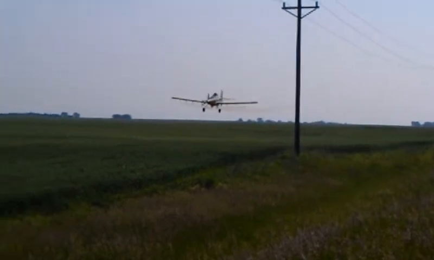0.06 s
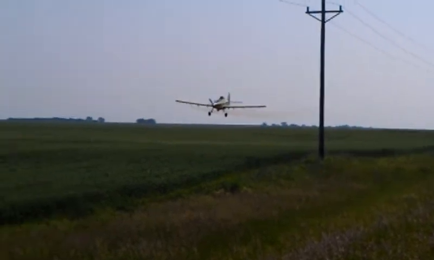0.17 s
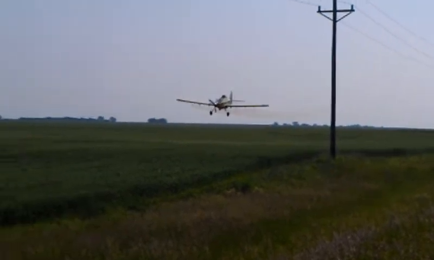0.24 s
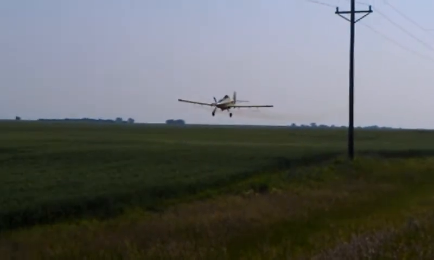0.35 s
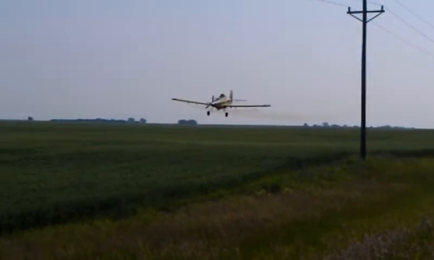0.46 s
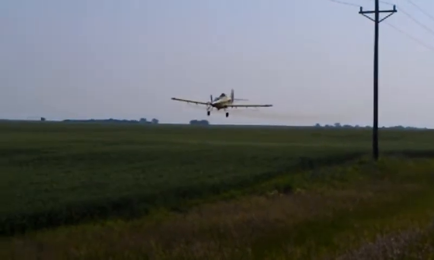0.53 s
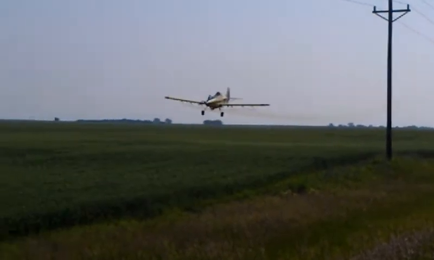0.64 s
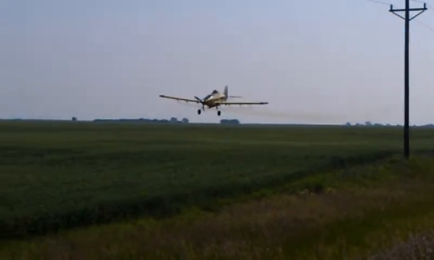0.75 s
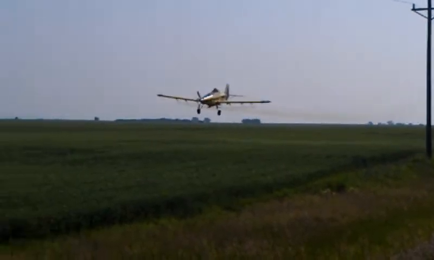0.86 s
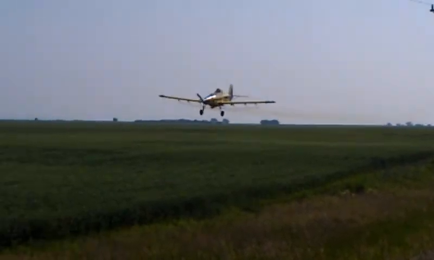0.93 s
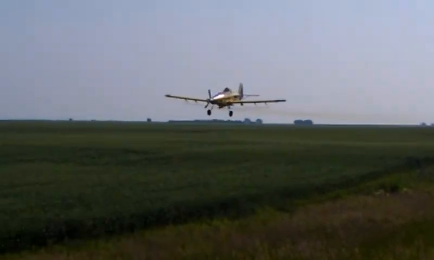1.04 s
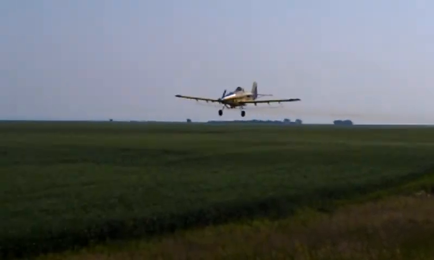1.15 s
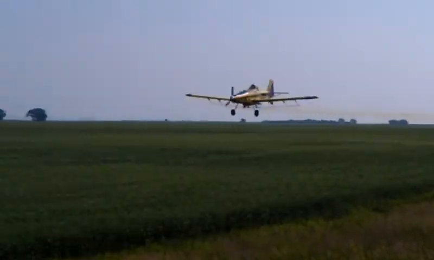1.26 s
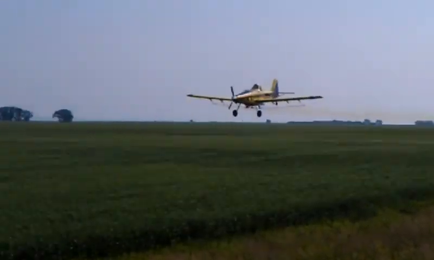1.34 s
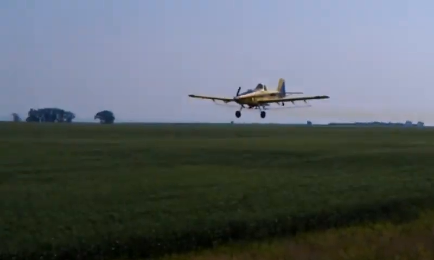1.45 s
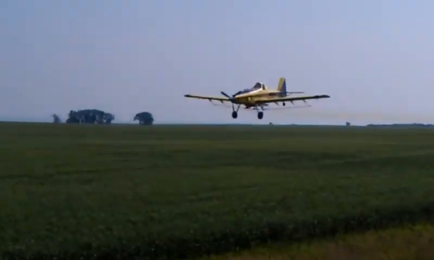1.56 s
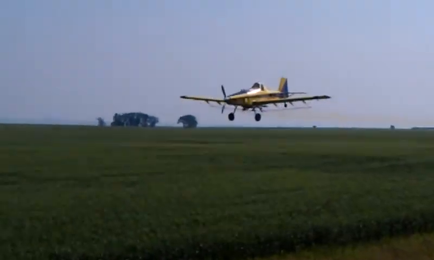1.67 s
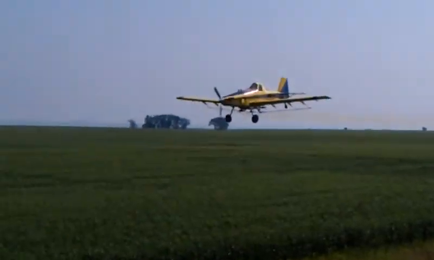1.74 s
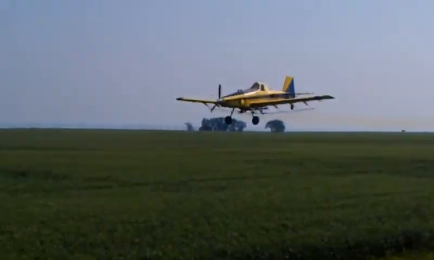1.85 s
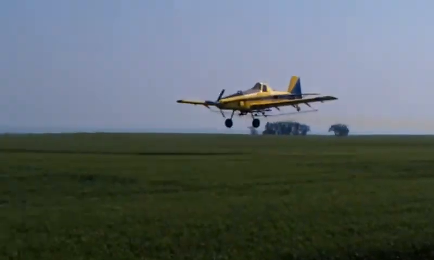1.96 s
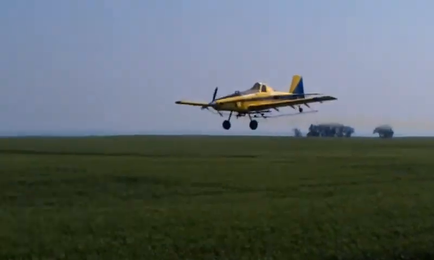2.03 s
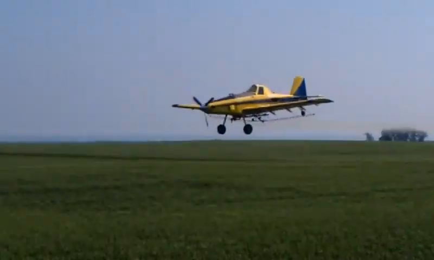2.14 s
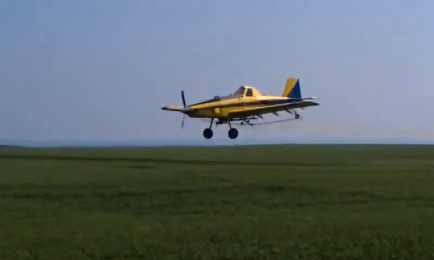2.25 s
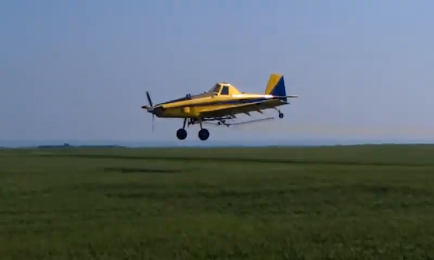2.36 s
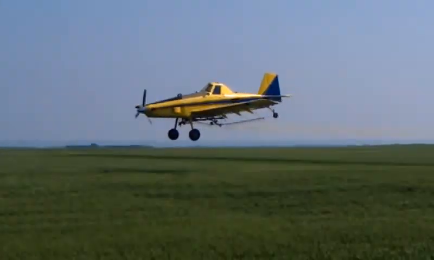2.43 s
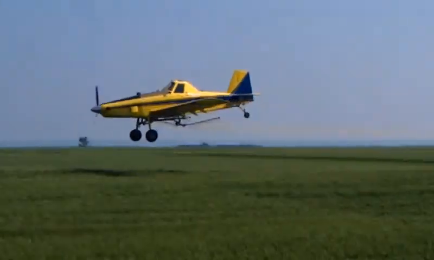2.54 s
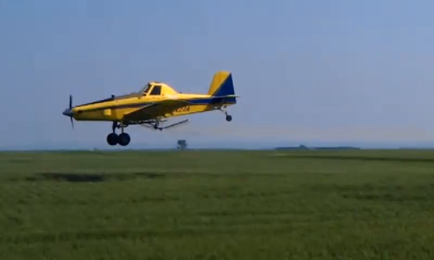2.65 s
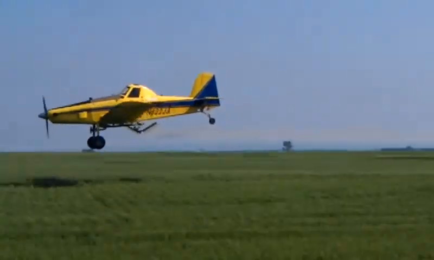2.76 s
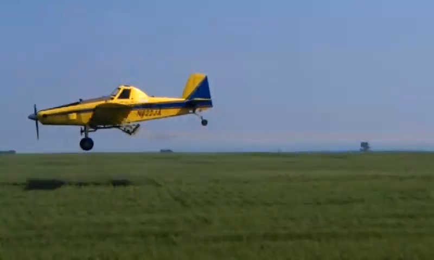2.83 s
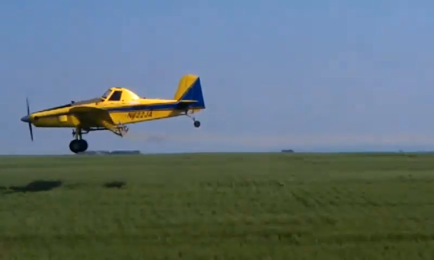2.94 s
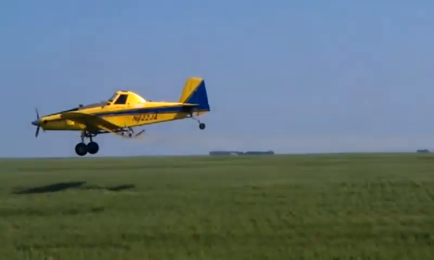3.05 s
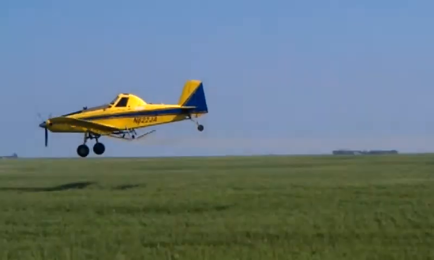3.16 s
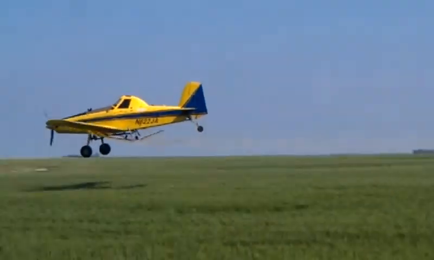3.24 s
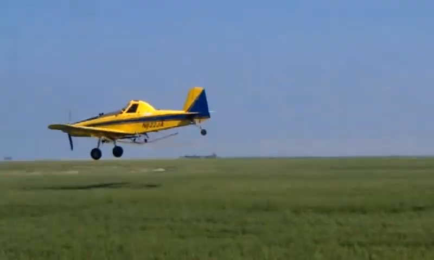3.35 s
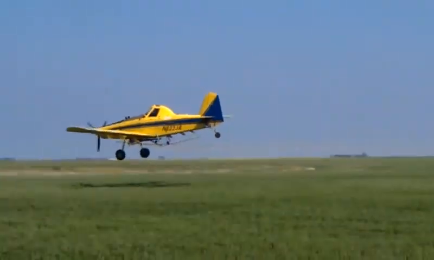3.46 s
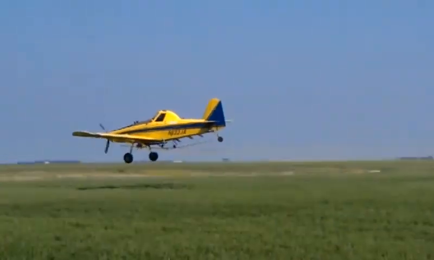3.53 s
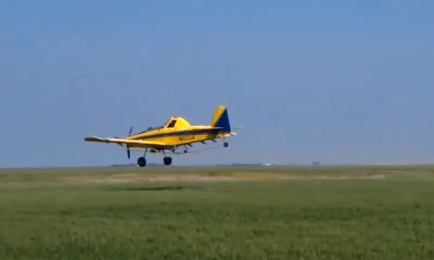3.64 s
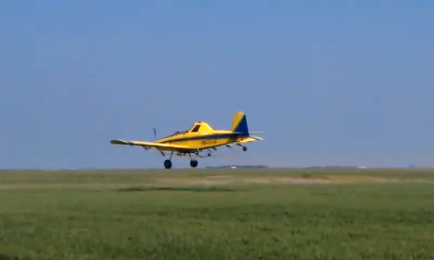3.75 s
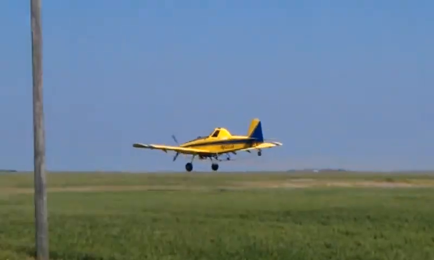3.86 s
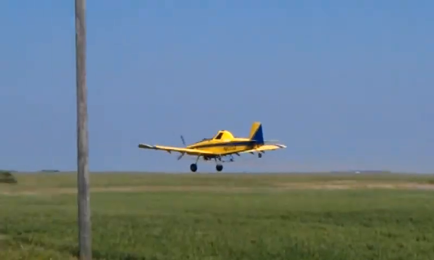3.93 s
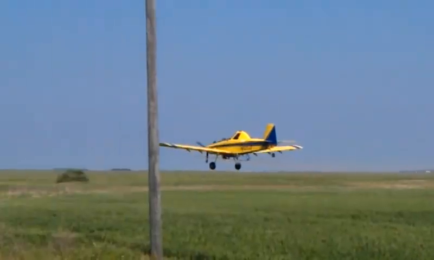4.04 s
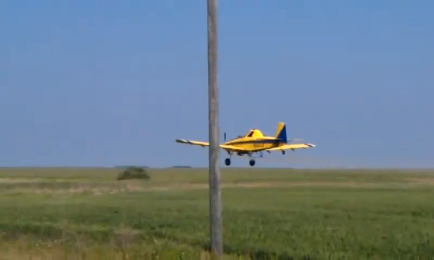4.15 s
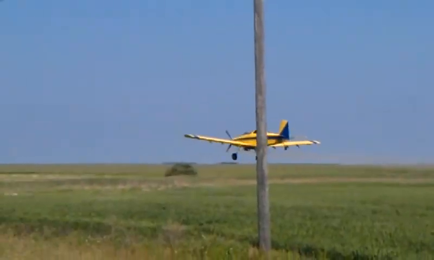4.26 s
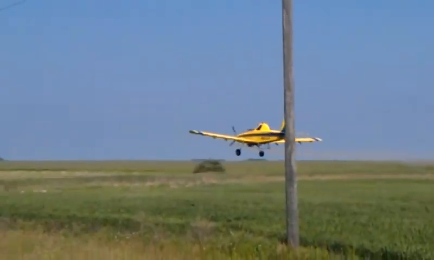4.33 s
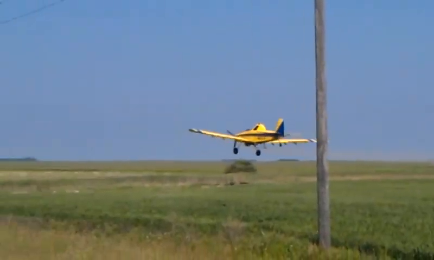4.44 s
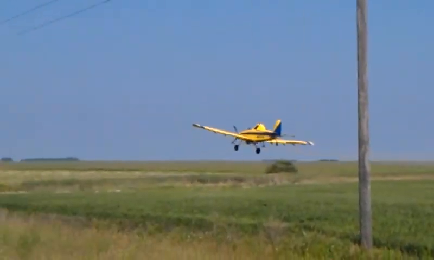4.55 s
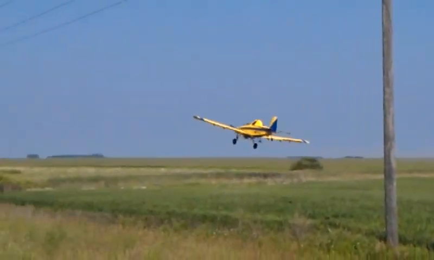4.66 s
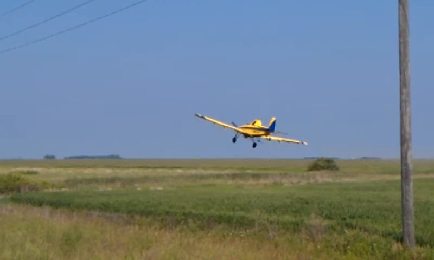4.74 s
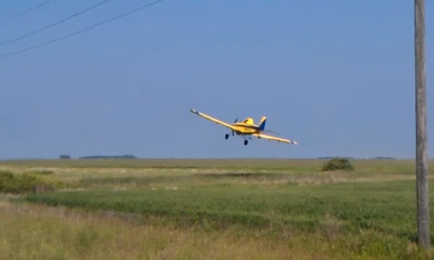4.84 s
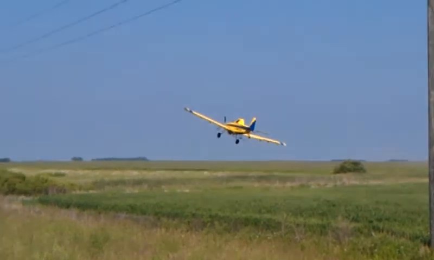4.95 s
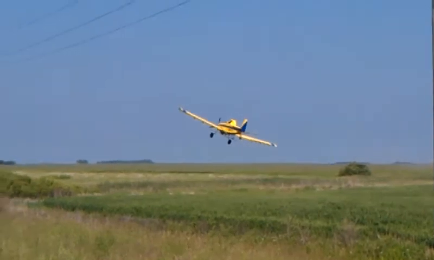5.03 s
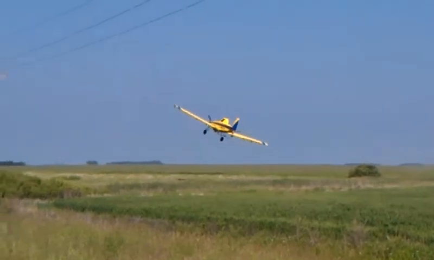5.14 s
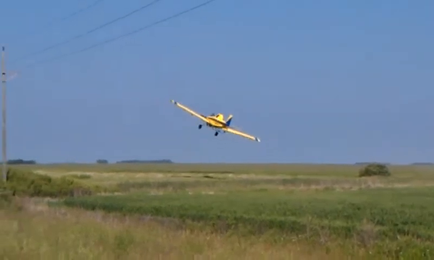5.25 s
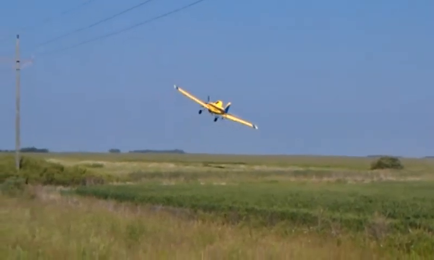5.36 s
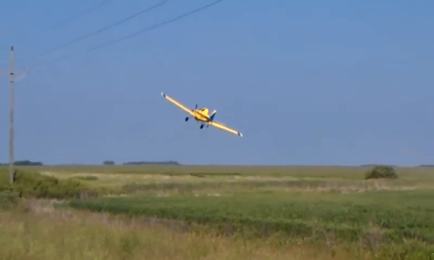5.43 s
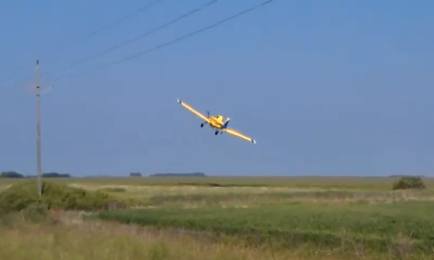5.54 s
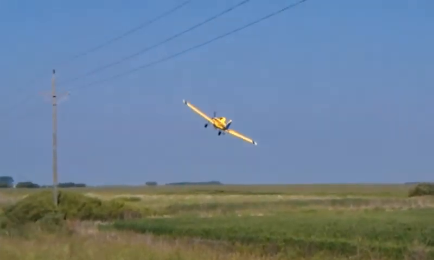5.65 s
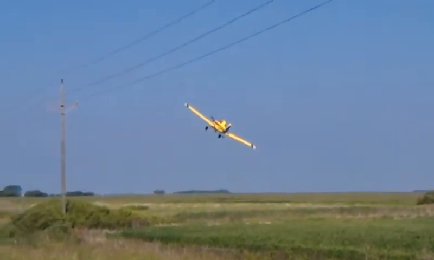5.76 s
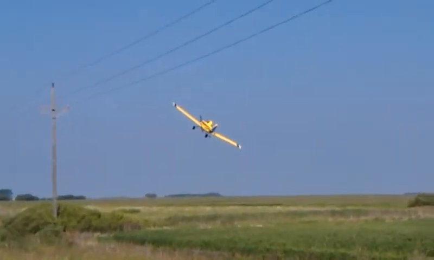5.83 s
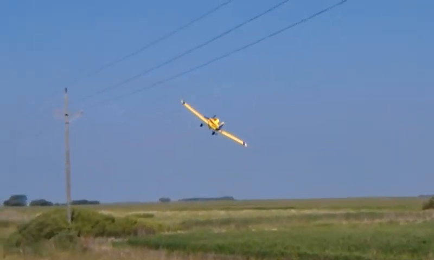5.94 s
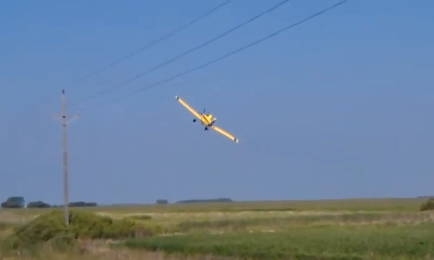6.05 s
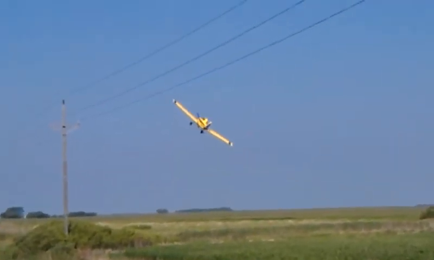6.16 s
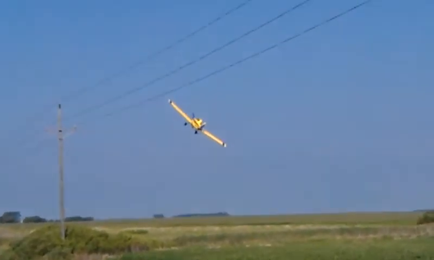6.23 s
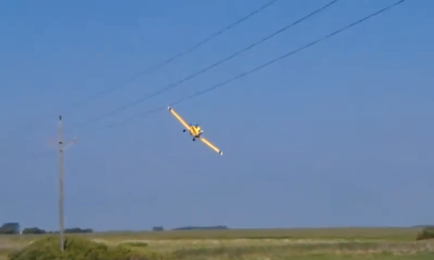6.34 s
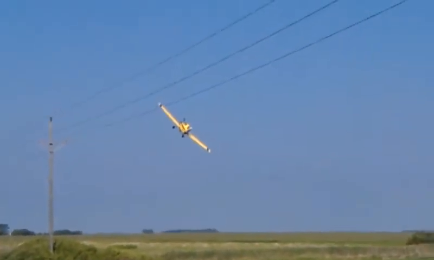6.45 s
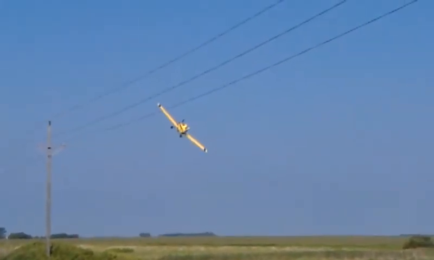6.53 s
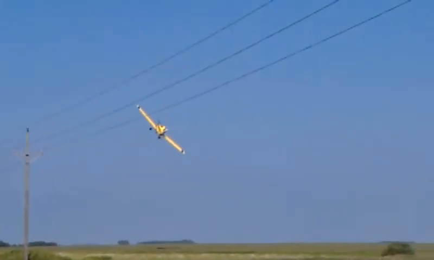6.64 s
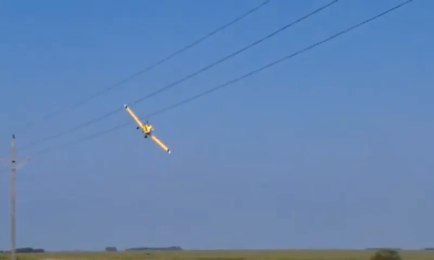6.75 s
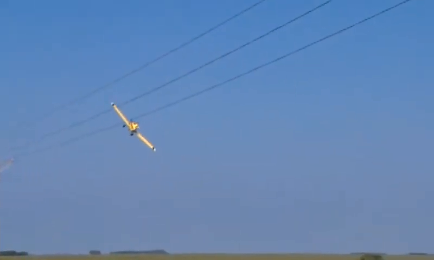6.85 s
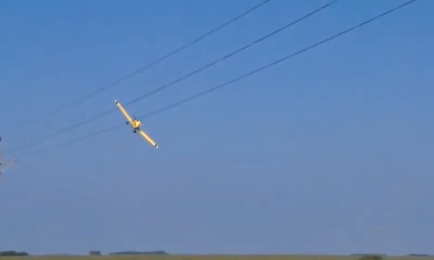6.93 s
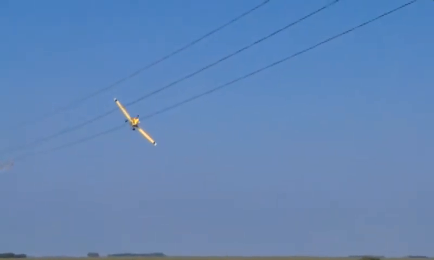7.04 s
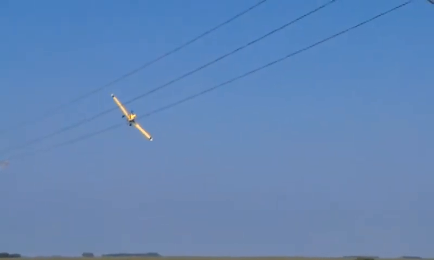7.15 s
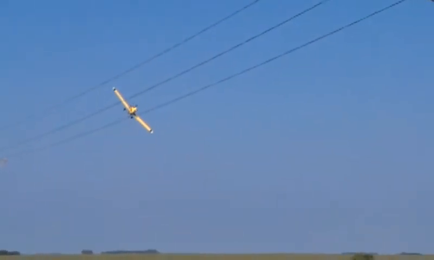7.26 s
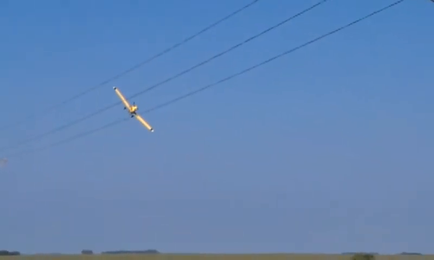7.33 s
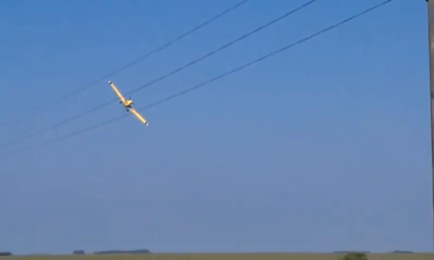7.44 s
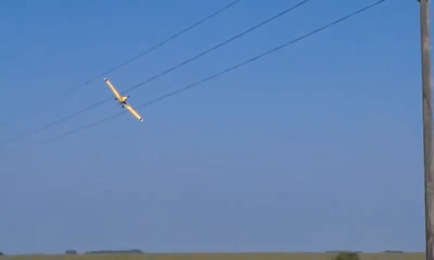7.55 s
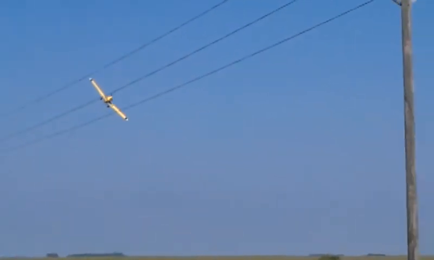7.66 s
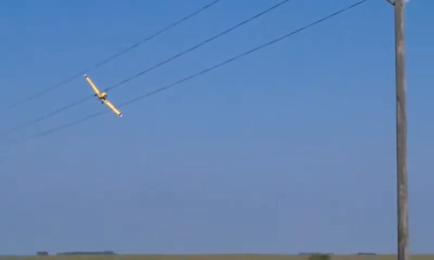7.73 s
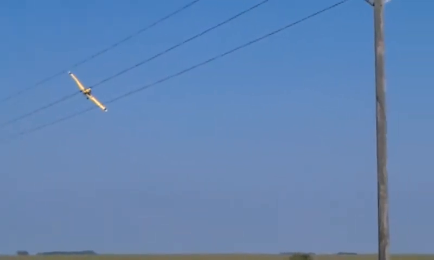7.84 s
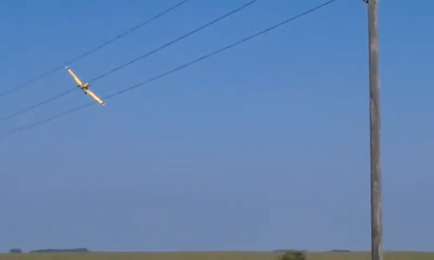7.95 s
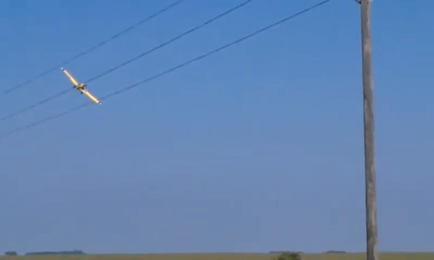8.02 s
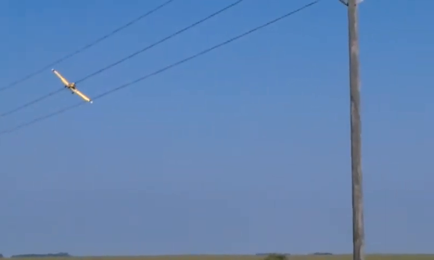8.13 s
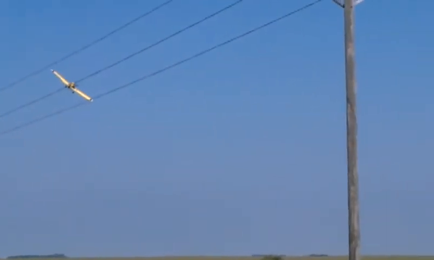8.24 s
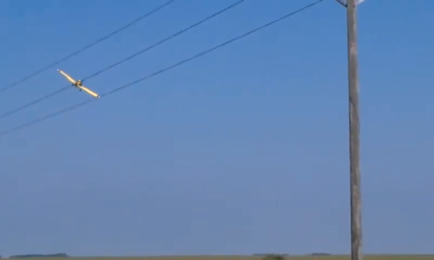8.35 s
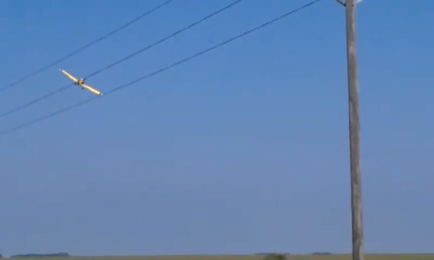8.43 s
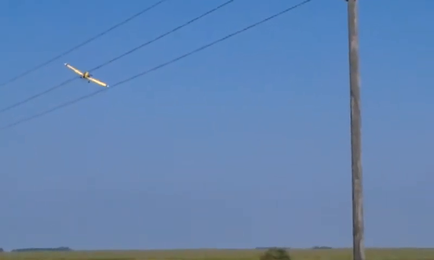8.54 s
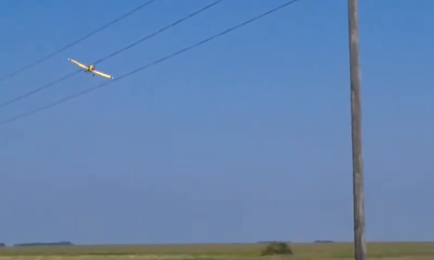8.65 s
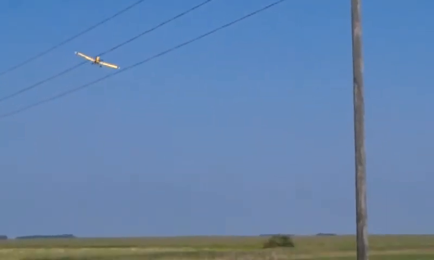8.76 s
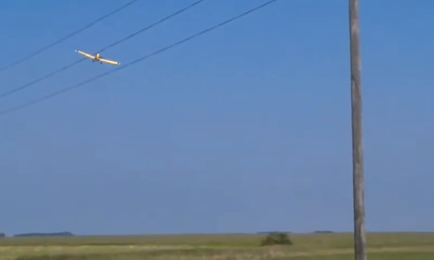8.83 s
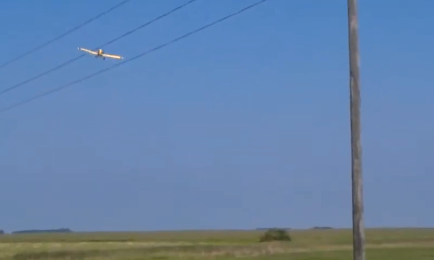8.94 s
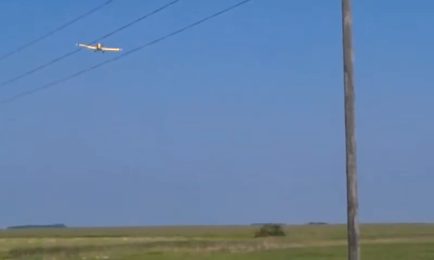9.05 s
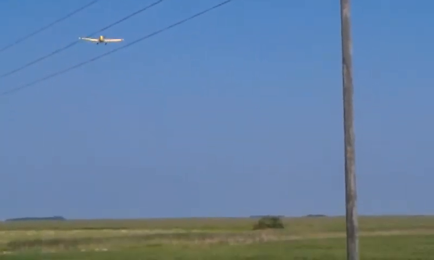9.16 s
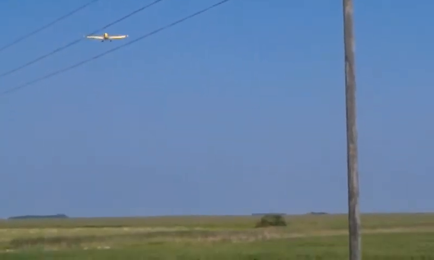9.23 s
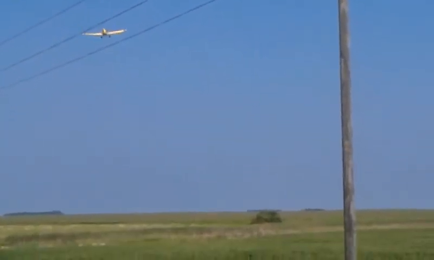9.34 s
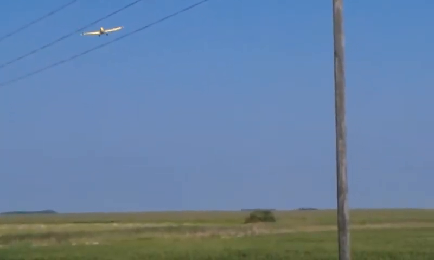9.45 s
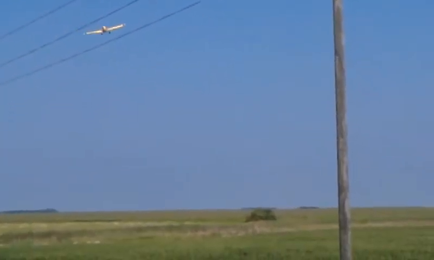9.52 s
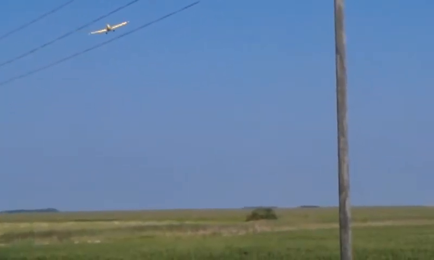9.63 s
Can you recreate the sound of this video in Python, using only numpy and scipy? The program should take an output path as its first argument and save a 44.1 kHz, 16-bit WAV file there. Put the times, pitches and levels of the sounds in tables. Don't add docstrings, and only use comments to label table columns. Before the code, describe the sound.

Outdoors by an open field, on a small unprotected microphone. From 0 s a low turboprop spray plane approaches: steady bright exhaust hiss, hollow low roar and thin high whine. Wind thumps at once, then from 0.4 to 2.6 s it batters hard, with lumpy rumble, crackles and sharp tears, the level ducking at each gust. A brief high bird cheep sits at about 2.1 s. From 2.3 s blade slap rises into a dense hard buzz, strongest around 2.8-3.3 s, sliding down by roughly a quarter in frequency and turning rounder before it fades near 4 s. Gusts bump again at 3.3-3.9 s. From 4 s the plane recedes, lower and softer, with a breathy whoosh at 5-7.5 s and a faint steady hum. A nearby diesel idles with uneven quick knocks, now clear. A grasshopper rasps and snaps dryly at 5.7 s. Scattered wind bumps continue until about 8.9 s; idle and distant roar remain to 9.7 s.

```python
import sys
import numpy as np
from scipy import signal
from scipy.io import wavfile
from scipy.ndimage import uniform_filter1d

SR = 44100
rng = np.random.default_rng(int(sys.argv[2]) if len(sys.argv) > 2 else 0)


def makeup_ratio(level_db):
    decades = np.asarray(level_db, float) / 20
    return 10 ** decades


def wrap_up_sound(samples):
    columns = np.atleast_2d(samples).T
    tamed = np.clip(columns, -1, 1)
    steps = np.round(tamed * 32767).astype(np.int16)
    wavfile.write(sys.argv[1], SR, steps)


N = 427329

# (strongest at [s], level [dB], 12 dB down before [s], after [s])
CRACK_BEAM = (2.84, -28, .42, .64)
BLADES_FROM_S = 2.1


def evened(x):
    return x / np.sqrt(np.mean(x ** 2) + 1e-20)


def curve(rows):
    s, *columns = np.transpose(rows)
    t = np.arange(s[0], s[-1], 1 / SR)
    return max(round(s[0] * SR), 0), [np.interp(t, s, c) for c in columns]


def whole(rows):
    s, *columns = np.transpose(rows)
    return [np.interp(np.arange(N) / SR, s, c) for c in columns]


def sampled(slow):
    return np.interp(np.arange(N) / 32, np.arange(len(slow)), slow)


def add(mix, start, sound):
    part = mix[start:][:len(sound)]
    part += sound[:len(part)]


def resonate(x, hz, width):
    turn = np.exp(2j * np.pi * np.cumsum(hz * np.ones(len(x))) / SR)
    r = np.exp(-np.pi * width / SR)
    smooth = signal.lfilter([(1 - r) ** 2], [1, -2 * r, r * r], x * turn.conj())
    return 2 * (turn * smooth).real


def wobble(hz, size):
    knots = rng.standard_normal(size // 64 + 2)
    slow = signal.lfilter(*signal.butter(2, np.clip(hz * 128 / SR, .001, .95)), knots)
    return evened(np.interp(np.arange(size) / 64, np.arange(len(knots)), slow))


def noise(colour, patchy_db):
    hz = np.fft.rfftfreq(1024, 1 / SR)
    f, db = np.transpose(colour)
    a, b, patches = rng.standard_normal((N // 256 + 5, 513, 3), dtype=np.float32).T
    patches = uniform_filter1d(patches, size=14, axis=0)
    patches = evened(uniform_filter1d(patches, size=12, axis=1))
    shape_db = np.interp(np.log(hz + 1), np.log(f), db, left=-90, right=-90)
    z = (a + 1j * b) * makeup_ratio(shape_db[:, None].astype(np.float32) + patchy_db * patches)
    return evened(signal.istft(z, nperseg=1024, noverlap=768)[1][:N])


def causal_phase(f, db):
    hz = np.arange(4096) * 2.
    gain = np.log(makeup_ratio(np.interp(np.minimum(hz, 8192 - hz), [0, *f, 4096], [-20, *db, -45])))
    return hz, -signal.hilbert(gain).imag


def beam(t, top_s, top_db, before_s, after_s):
    return top_db - 12 * (abs(t - top_s) / np.where(t < top_s, before_s, after_s)) ** 4.0


def blade_turns(start, size):
    # (time [s], rate [Hz])
    coming = [
        (0, 122.45),
        (1, 122.4),
        (1.4, 121.3),
        (2, 118),
        (2.3, 114.6),
    ]
    passing = [
        (2.5, 112.1),
        (2.884, 104.7),
        (3.198, 98.0),
        (3.44, 94.14),
        (3.5, 91.9),
    ]
    going = [
        (3.75, 90.3),
        (4.1, 88.2),
        (4.5, 86.6),
        (5.4, 84.9),
        (5.75, 83.85),
        (7.6, 83.8),
        (9.69, 83.8),
    ]
    hz = whole(coming + passing + going)[0][start:start + size]
    return 2 * np.pi * np.cumsum(hz) / SR


def ducking():
    # (time [s], change [dB], back after [s])
    drops = [(.445, -5.5, 0.41), (.69, -1.5, 0.029), (.77, -5, 0.34), (1.085, -4.5, 0.025),
             (1.09, -4, 0.23), (1.202, -2, 0.039), (2.155, 6.5, 0.03), (5.778, 1, .03), (1.495, -5.5, 0.16),
             (1.78, -4.5, 0.11), (1.98, -3.5, 0.15), (2.19, -6.5, 0.18), (2.42, -3, 0.27),
             (2.8, -1.5, 0.17), (2.95, -5, 0.19), (3.922, -6.5, 0.11), (4.2, -1.5, .2), (5.73, 0.5, .1),
             (6.2, -3.5, 0.095), (6.88, -2.5, 0.07)]
    fall_s, hold = 0.0042, 4.5
    t = np.arange(0, N, 32) / SR
    gain_db = 0
    for s, db, back in drops:
        fall = np.clip((t - s) / fall_s, 0, 1)
        gain_db = gain_db + db * fall * (1 - np.clip((t - s) / back, 0, 1) ** hold)
    return sampled(gain_db)


def wind_level():
    # (time [s], strength [dB])
    swell = [(0, -36), (.22, -34), (.34, -35), (.42, -24.5), (.7, -23.5), (.76, -22), (1.38, -26.5),
             (1.51, -19.5), (2.68, -24), (2.8, -32), (3.1, -34), (3.17, -31), (3.5, -26.5), (3.9, -27.5),
             (4.0, -35), (8.3, -39), (8.5, -46), (9.02, -52)]
    # (peak time [s], peak [dB], length [s])
    gusts = [(0.018, -28.5, 0.049), (0.182, -19, 0.066), (0.263, -34, .04), (0.665, -27.5, 0.043),
             (2.418, -26, 0.036), (3.303, -23, 0.12), (3.467, -21.5, 0.054), (3.555, -26, 0.022),
             (3.77, -39, .1), (3.924, -20.5, 0.044), (4.434, -29.5, 0.44), (4.846, -23, 0.024),
             (5.133, -33, 0.21), (5.282, -24.5, 0.035), (5.496, -27, 0.099), (5.747, -29, 0.057),
             (6.24, -30, 0.086), (6.412, -34, 0.17), (6.64, -32.5, 0.058), (8.1, -30.5, 0.1),
             (8.574, -34, 0.059), (8.639, -27.5, 0.017), (8.714, -31.5, 0.064), (8.886, -36.5, 0.098)]
    # (deepest time [s], drop [dB], length [s])
    lulls = [(.42, -3, .025), (0.716, -4.5, 0.022), (0.842, 0.5, 0.018), (1.137, -7, 0.032),
             (1.834, -1, 0.029), (1.88, 0, 0.016), (1.923, -1.5, 0.017), (1.99, -2, 0.021),
             (3.885, -5, 0.021), (4.0, -7, 0.035), (5.305, -1, .03), (8.03, -7, 0.029), (0.32, -8, 0.075),
             (0.958, -4, .02), (0.582, -5, 0.11), (0.691, -8, 0.031), (0.95, -6, 0.028),
             (1.086, -10, 0.035), (1.23, -9, 0.023), (1.703, -8, 0.017), (1.544, -4, 0.016),
             (1.693, -1.5, 0.025), (1.868, -0.5, 0.033), (2.046, -0.5, 0.014), (2.204, -6, 0.016),
             (2.247, -2, 0.014), (2.15, -7, 0.013), (2.297, -9, 0.079), (2.465, -8, 0.046),
             (3.604, -2.5, 0.096), (3.798, -1.5, 0.065)]
    t = np.arange(0, N, 32) / SR
    power = makeup_ratio(2 * np.interp(t, *np.transpose(swell)))
    power = power + sum(makeup_ratio(2 * db) * np.exp(-(2.9 * (t - s) / length) ** 2) for s, db, length in gusts)
    lulls_db = sum(db * np.exp(-(2 * (t - s) / length) ** 4) for s, db, length in lulls)
    return sampled(10 * np.log10(power) + lulls_db)


def roar():
    # (time [s], loudness [dB], low roar above the hiss [dB])
    loudness = [(0, -29.5, -1), (1.48, -31.5, -0.5), (1.7, -35, 3.5), (2.16, -38.5, 1.5), (2.38, -28, -2),
                (2.7, -34.5, 4), (3.2, -32.5, -1), (3.5, -32.5, 0), (3.85, -29, -2.5), (4.05, -34.5, -4.5),
                (4.43, -35.5, 0), (4.8, -40.5, 4), (5.05, -33, 0.5), (5.6, -38, 4), (5.85, -44, 11),
                (6.85, -40, 8), (7.4, -41.5, 7), (9.69, -43, 7)]
    # (frequency [Hz], level [dB per Hz])
    hiss_near = [(710, -36), (1200, -15), (1310, -15), (1770, -1.5), (2380, -4.5), (2640, -5.5), (3430, -7),
                 (3820, -13), (6000, -21), (7800, -41.5), (13200, -120)]
    hiss_away = [(710, -5.5), (1200, -3.5), (1550, -4.5), (2400, -0.5), (2730, -2.5), (3040, -1.5),
                 (3930, -10), (5720, -14.5), (6000, -18.5), (7800, -46), (13200, -120)]
    low_colour = [(40, -31), (65, -1.5), (120, -15.5), (200, -13.5), (300, -11.5), (450, -9.5), (560, -6.5),
                  (650, -2.5), (750, -4), (950, -6), (1200, -7.5), (1480, -9.5), (1700, -19.5),
                  (2400, -23.5)]
    fizz_colour = [(3500, -18.5), (4800, -2), (5800, -3.5), (6200, -4.5), (7000, -4.5), (7900, -9.5),
                   (8500, -16.5), (9300, -32), (16000, -26)]
    # (time [s], frequency [Hz], level over hiss [dB])
    whoosh = [(3.0, 2500, -24), (3.4, 2310, -6), (4.1, 2340, -9.5), (4.7, 2240, -48), (5.0, 2100, -6),
              (5.3, 2210, -3), (5.7, 2050, -2.5), (6.1, 2020, 0), (6.45, 2020, -3), (6.75, 2070, 0),
              (7.0, 2130, -0.5), (7.5, 2060, -24)]
    # (time [s], frequency [Hz], width [Hz], level [dB])
    intake = [(0, 10900, 596, -65.5), (.7, 11360, 598, -68.5), (.95, 11200, 600, -82),
              (1.1, 11300, 600, -66), (1.5, 11300, 616, -58.5), (2.25, 11020, 700, -64),
              (2.31, 10860, 2380, -58), (2.85, 10220, 2400, -59), (2.97, 11200, 2200, -60),
              (3.08, 11250, 2726, -54.5), (3.85, 10800, 2880, -53.5), (4.0, 11100, 2580, -64),
              (4.85, 10600, 2200, -72), (5.17, 10400, 2000, -69), (5.5, 10200, 1500, -72),
              (5.6, 10200, 1500, -86)]
    # (time [s], extra level [dB], before [s], after [s])
    duct_beam = (.2, 2.5, .4, 0.42)
    fizz_near_db, fizz_away_db = -23, -16.5
    loud_db, low_db = whole(loudness)
    duck_db, t = ducking(), np.arange(N) / SR
    flutter = wobble(30, N)

    duct = resonate(rng.standard_normal(N), 679 * (1 + 0.022 * wobble(1.7, N)), width=130)
    duct = makeup_ratio(-12) * (1 + makeup_ratio(beam(t, *duct_beam))) * evened(duct)

    gone = np.clip((t - 2.4) / 1.2, 0, 1)
    hiss = np.sqrt(1 - gone) * noise(hiss_near, patchy_db=1.5)
    hiss += np.sqrt(gone) * noise(hiss_away, patchy_db=1.46)
    start, (hz, db) = curve(whoosh)
    jet_hz = hz * (1 + 0.034 * wobble(4.3, len(hz)))
    jet = resonate(rng.standard_normal(len(hz)), jet_hz, width=640)
    add(hiss, start, makeup_ratio(db + 0.99 * wobble(6.9, len(hz))) * evened(jet))

    angle = blade_turns(0, N) - blade_turns(0, round(BLADES_FROM_S * SR))[-1]
    chop_depth = .3 * makeup_ratio(beam(t, *CRACK_BEAM) - CRACK_BEAM[1])
    chop = 1 + chop_depth * np.cos(angle - 1.8)
    wide = makeup_ratio(loud_db + duck_db + 0.64 * flutter) * hiss * chop
    low_gain = makeup_ratio(loud_db + low_db + 0.72 * duck_db + 0.63 * flutter)
    wide += low_gain * (noise(low_colour, patchy_db=0.5) + duct)
    fizz_db = fizz_near_db + (fizz_away_db - fizz_near_db) * np.clip((t - 2.2) / 0.36, 0, 1)
    fizz_db = fizz_db + 0.97 * duck_db + 2.0 * wobble(7.7, N)
    wide += makeup_ratio(loud_db + fizz_db + 1.1 * flutter) * noise(fizz_colour, patchy_db=3.0) * chop

    start, (hz, width, db) = curve(intake)
    air = rng.standard_normal(len(hz))
    narrow, broad = (evened(resonate(air, hz, w)) for w in (900, 3500))
    share = np.clip((width - 600) / 2400, 0, 1)
    db = db + .6 * duck_db[start:start + len(db)] + 2.0 * wobble(15, len(hz))
    add(wide, start, makeup_ratio(db) * (np.sqrt(1 - share) * narrow + np.sqrt(share) * broad))
    return wide


def gear_whine():
    # (start [s], length [s], level [dB], multiple of the blade rate [1])
    lines = [(0, .06, -41, 28.6), (.06, .3, -45, 28.6), (.36, .095, -41, 28.6), (.5, .17, -51, 28.6),
             (.71, .08, -39.5, 28.6), (.8, .2, -50, 28.6), (1.31, .13, -50, 28.6), (.15, .12, -45, 29.6),
             (.36, .1, -48, 29.6), (.72, .3, -55, 29.6), (1.3, .1, -53, 29.6), (5.36, .2, -49, 28.6),
             (5.79, .45, -50, 28.6), (6.23, .24, -46, 28.6), (6.6, .17, -48, 28.6), (6.86, .18, -47, 28.6),
             (7.03, .6, -55, 28.6), (5.5, 2.45, -46.5, 2)]
    out, turns = np.zeros(N), blade_turns(0, N)
    drift, shimmer_db = 0.15 * wobble(12.0, N), 1.5 * wobble(21, N)
    for s, length, db, k in lines:
        a, size = round(s * SR), round(length * SR)
        line = np.sin(k * turns[a:a + size] + drift[a:a + size])
        line = line * makeup_ratio(db + 3.5 + shimmer_db[a:a + size])
        add(out, a, line * signal.windows.tukey(size, min(.02 / length, 1)))
    return out


def diesel():
    # (multiple of the firing rate [1], level [dB])
    hum_parts = [(2, -59.5), (3, -67), (4, -75)]
    cylinders = [-1, -3, 0, -5, 5, 2.5]
    # (frequency [Hz], width [Hz], level [dB])
    knock_modes = [(700, 280, -60), (3090, 580, -47.5), (5310, 1200, -54.5)]
    # (time [s], level [dB])
    heard = [
        (0, -25),
        (4, -4),
        (4.5, -7),
        (7, -3.5),
        (9.69, -4),
    ]
    firing_hz = 35.63
    turns = np.cumsum(firing_hz * (1 + 0.0065 * wobble(4.3, N))) / SR
    hum = sum(np.sqrt(2) * makeup_ratio(db) * np.sin(2 * np.pi * k * turns) for k, db in hum_parts)
    strength = makeup_ratio(np.array(cylinders)[turns.astype(int) % len(cylinders)])
    puffs = rng.standard_normal(N) * strength * (0.23 + np.exp(-(turns % 1) / 0.3))
    knock = 0
    for hz, width, db in knock_modes:
        band = signal.butter(2, [hz - width / 2, hz + width / 2], "bandpass", fs=SR)
        knock = knock + makeup_ratio(db) * evened(signal.lfilter(*band, puffs))
    return makeup_ratio(whole(heard)[0]) * (hum + knock)


def wind():
    # (frequency [Hz], level [dB per Hz])
    gusty = [(12, -53), (20, 4), (54, -22), (123, 5.5), (282, 3), (659, -2.5), (1050, -13.5), (1390, -44),
             (1600, -16.5), (2500, -53), (3250, -68), (5500, -120)]
    # (time [s], peak [dB], frequency [Hz])
    thumps = [(0.145, -10.5, 324), (0.187, 5, 305), (0.255, -14.5, 153), (0.44, -7.5, 171),
              (1.195, -12.5, 354), (0.657, -9, 159), (0.761, -9.5, 273), (0.978, -10.5, 334),
              (1.073, -12, 312), (1.172, -11, 380), (1.488, 0, 149), (1.649, -4, 244), (1.719, -6, 277),
              (2.177, -6.5, 290), (2.212, -8, 190), (2.253, -18, 227), (2.467, -9, 123), (3.658, -8.5, 286),
              (3.91, -3.5, 190), (4.349, -15.5, 141), (4.421, -14.5, 158), (5.202, -11.5, 195),
              (5.274, -17, 170), (5.485, -12, 281), (5.729, -18, 203), (6.263, -9, 160), (6.36, -19, 151),
              (6.633, -20, 250), (8.627, -17, 200), (8.877, -13.5, 168), (.798, -16, 188),
              (0.856, -20, 269), (0.911, -19, 254), (0.926, -14, 212), (1.032, -14, 398), (1.1, -12.5, 364),
              (1.204, -13, 337), (1.281, -15, 247), (1.31, -13, 270), (1.552, -18, 263), (1.585, -10, 392),
              (1.886, -16, 476), (1.95, -10, 330), (2.155, -21, 583), (2.19, -10, 290), (2.229, -17, 230),
              (2.261, -14.5, 230), (2.314, -12, 149), (2.325, -19, 328), (2.357, -16, 586),
              (2.405, -10, 357), (3.495, -10, 230), (3.53, -10, 198), (3.765, -10, 180), (3.856, -9, 231),
              (3.977, -21, 266)]
    calm_db, storm_db = -38.5, -21
    lumps = makeup_ratio(2.6 * wobble(30, N) + 4.5 * wobble(140, N))
    eddies = evened(noise(gusty, patchy_db=1.2) * lumps)
    eddies = evened(np.tanh(eddies / 1.5))
    strength_db = wind_level()
    storm = np.clip((strength_db - calm_db) / (storm_db - calm_db), 0, 1)
    dark = 1.34 * signal.lfilter(*signal.butter(2, 290, fs=SR), eddies)
    out = makeup_ratio(strength_db - 0.5) * (storm * eddies + (1 - storm) * dark)
    t = np.arange(1800) / SR
    swell = (t / .006) ** 2.86 * np.exp(-t / 0.0018)
    draws = rng.standard_normal((len(thumps), 1800))
    for (s, db, hz), draw in zip(thumps, draws):
        edge = 0.1 + 0.35 * storm[round(s * SR) + 300]
        body = np.sin(2 * np.pi * hz * t + draw[0])
        thump = (body + edge * evened(resonate(draw, 2.2 * hz, 700))) * swell
        add(out, round(s * SR), makeup_ratio(db - 4.0) * thump / abs(thump).max())
    return signal.lfilter(*signal.butter(2, 125, "highpass", fs=SR), out) + .12 * out


def crackle():
    # (time [s], peak [dB])
    tears = [(0.442, -10), (0.744, -17), (0.77, -6), (0.981, -16), (1.177, -16), (1.195, -23), (1.508, -16),
             (1.566, -25), (1.584, -8), (1.621, -16), (1.655, -20), (1.662, -6), (1.724, -13), (1.739, -7),
             (1.757, -10), (1.819, -9), (1.841, -11), (1.893, -21), (1.914, -11.5), (1.964, -14),
             (2.015, -20), (2.023, -10), (2.06, -12), (2.088, -11), (2.159, -23), (2.216, -12),
             (2.368, -19), (2.662, -20), (3.91, -21), (3.92, -24)]
    wind_db = wind_level()
    pops = (rng.random(N) < 140 / SR) * rng.standard_normal(N)
    t = np.arange(400) / SR
    pop = np.sin(2 * np.pi * 620 * t ** .9 * .5) * np.exp(-t / .0011)
    pops = evened(signal.oaconvolve(pops, pop - pop.mean())[:N])
    out = makeup_ratio(-29.0 + 2.24 * (np.minimum(wind_db, -19) + 21.0)) * pops
    for (s, db), (side, size) in zip(tears, rng.random((len(tears), 2))):
        tear = np.sin(2 * np.pi * (900 + 400 * size) * t) * np.exp(-t / .0009)
        add(out, round(s * SR), np.sign(side - .5) * makeup_ratio(db - 3) * tear / tear.max())
    return out


def buffets():
    # (time [s], peak [dB], frequency [Hz])
    eddy_lumps = [(.474, -11, 252), (1.087, -25, 303), (1.376, -17, 546), (1.962, -10.5, 513),
                  (2.104, -13, 302), (2.126, -15, 280), (2.157, -17, 610), (2.184, -10, 332),
                  (2.251, -8, 260), (2.285, -18, 238), (2.316, -9, 233), (2.426, -13, 249),
                  (2.495, -15, 250), (2.574, -12, 330), (3.843, -17, 260), (4.164, -19.5, 200),
                  (5.224, -18, 218), (6.224, -20.5, 218), (8.104, -19, 220), (8.0, -23, 110),
                  (8.18, -21, 110), (.15, -15, 300), (4.46, -16, 160), (5.27, -14.5, 262),
                  (6.366, -18, 200), (3.3, -13, 150), (3.915, -17, 450), (8.63, -21, 250)]
    out, t = np.zeros(N), np.arange(1200) / SR
    swell = (t / .006) ** 2.6 * np.exp(-t / 0.0022)
    for (s, db, hz), turn in zip(eddy_lumps, rng.random(len(eddy_lumps))):
        lump = np.sin(2 * np.pi * (hz * t + turn)) * swell
        add(out, round(s * SR), makeup_ratio(db - 6.0) * lump / abs(lump).max())
    return out


def bird():
    # (time [s], frequency [Hz], level [dB])
    cheep = [
        (2.02, 7500, -56),
        (2.035, 7540, -49),
        (2.06, 7400, -46),
        (2.08, 7800, -63),
        (2.1, 7840, -47),
        (2.132, 7950, -64),
    ]
    start, (hz, db) = curve(cheep)
    out = np.zeros(N)
    add(out, start, makeup_ratio(db) * np.sin(2 * np.pi * np.cumsum(hz) / SR + 1.1 * wobble(200, len(hz))))
    return out


def propeller():
    # (frequency [Hz], level [dB])
    slap_colour = [(200, -8), (310, -1.5), (380, -4), (402, -8), (420, -13), (520, -5), (624, 2.5),
                   (728, 1), (832, -3.5), (870, -4.5), (936, -14), (1040, -7), (1150, -14), (1300, -17),
                   (1560, -19), (1900, -25), (2400, -33)]
    # (time [s], level [dB])
    tone_level = [(2.1, -55), (2.42, -39), (2.85, -38), (3.0, -34), (3.2, -32.5), (3.35, -29), (3.5, -31),
                  (3.65, -31), (3.75, -29), (3.88, -33), (3.97, -43), (4.28, -44), (4.4, -51), (4.7, -58),
                  (5, -70)]
    # (strongest at [s], level [dB], 12 dB down before [s], after [s])
    body_beam = (3.2, -26, .75, .42)
    edge_beam = (2.9, -28, .4, .5)
    start = round(BLADES_FROM_S * SR)
    t = np.arange(start, 5 * SR) / SR
    turns = blade_turns(start, len(t))
    hz = np.gradient(turns) * SR / (2 * np.pi)
    turns = turns + .025 * wobble(30, len(hz))
    f, db = np.transpose(slap_colour)
    lag = causal_phase(f, db)
    slap = []
    for k in range(2, 24):
        front_lead = .4 * max(k - 7, 0)
        phase = k * (turns - 1.0) + np.interp(k * hz, *lag) + front_lead
        slap.append(makeup_ratio(np.interp(k * hz, f, db)) * -np.cos(phase))
    air_db = .7 * wobble(30, len(hz))
    tone = makeup_ratio(np.interp(t, *np.transpose(tone_level)) + .8 * wobble(12, len(hz)))
    sound = tone * np.cos(turns + 2.3)
    sound += makeup_ratio(beam(t, *body_beam) - 1.5 + air_db) * sum(slap[:3])
    sound += makeup_ratio(beam(t, *CRACK_BEAM) + air_db) * sum(slap[3:5])
    sound += makeup_ratio(beam(t, *edge_beam) + air_db) * sum(slap[5:])
    out = np.zeros(N)
    add(out, start, np.sqrt(2) * sound)
    return out


def grasshopper():
    # (time [s], level [dB])
    rasp = [
        (5.66, -72),
        (5.69, -62),
        (5.73, -38.5),
        (5.745, -48),
        (5.772, -41.5),
        (5.78, -42),
    ]
    # (time [s], peak [dB])
    snaps = [
        (5.7548, -22),
        (5.7737, -21),
        (5.7765, -10),
    ]
    out = np.zeros(N)
    high = signal.butter(3, [6300, 14000], "bandpass", fs=SR, output="sos")
    start, (level_db,) = curve(rasp)
    teeth = rng.standard_normal(len(level_db)) * makeup_ratio(3.1 * wobble(300, len(level_db)))
    add(out, start, makeup_ratio(level_db) * evened(signal.sosfilt(high, teeth)))
    t = np.arange(200) / SR
    for s, db in snaps:
        snap = signal.sosfilt(high, rng.standard_normal(200))
        snap = snap * np.exp(-t / .0005) * np.minimum(t / .0003, 1)
        add(out, round(s * SR), makeup_ratio(db) * snap / abs(snap).max())
    return out


def scene():
    # (time [s], amplitude [full scale])
    ceiling_rows = [
        (0, .8),
        (.3, .8),
        (.45, .27),
        (9.7, .27),
    ]
    plane = roar() + gear_whine() + propeller()
    near = diesel() + grasshopper()
    loud = plane + wind() + crackle() + buffets() + bird()
    ceiling = whole(ceiling_rows)[0]
    return (loud / (1 + (loud / ceiling) ** 4) ** .25 + near)[None]


def roll_off(x):
    return signal.sosfilt(signal.butter(12, 16340, fs=SR, output="sos"), x)


def record(dry):
    # (frequency [Hz], level [dB per Hz])
    mic_hiss = [(6000, -46), (7000, -9), (9000, -2.5), (12000, -4), (15700, -9.5), (15900, -71)]
    x = dry[0] + makeup_ratio(-65.5) * noise(mic_hiss, patchy_db=-1.5)
    x = signal.sosfilt(signal.butter(3, 65, "highpass", fs=SR, output="sos"), x) + 0.019 * x
    mix = .9 * np.tanh(x / .9)
    return roll_off(mix[None])


dry = scene()
out = record(dry)
wrap_up_sound(out)
```